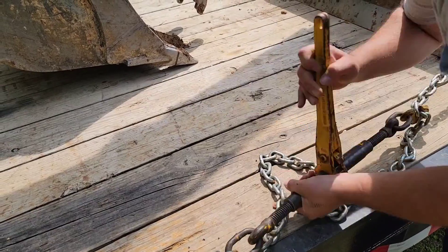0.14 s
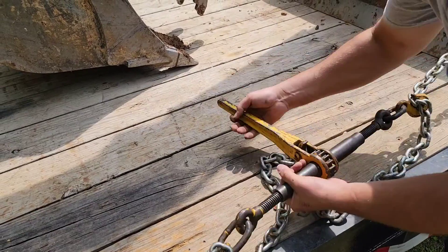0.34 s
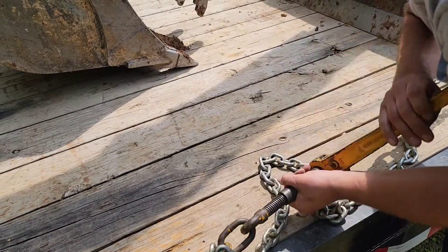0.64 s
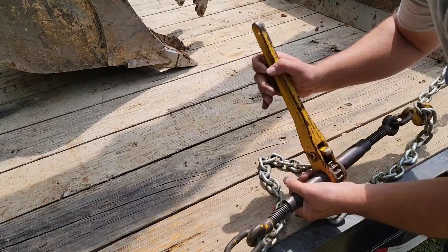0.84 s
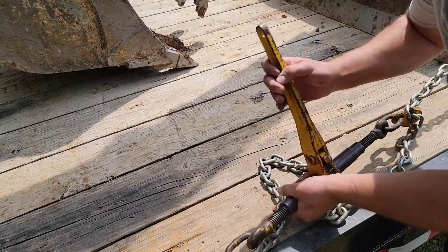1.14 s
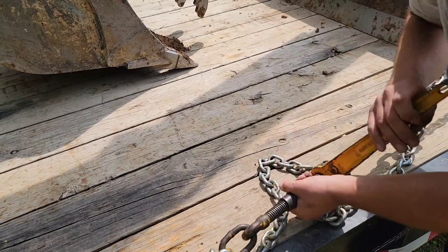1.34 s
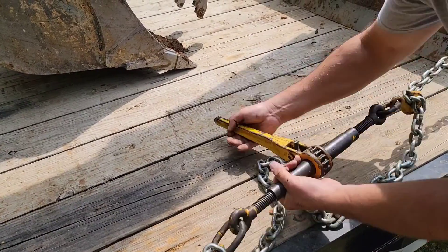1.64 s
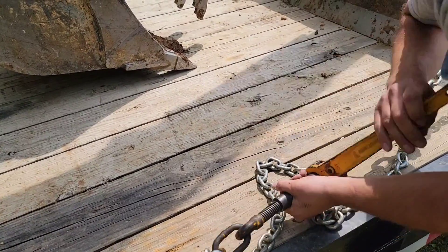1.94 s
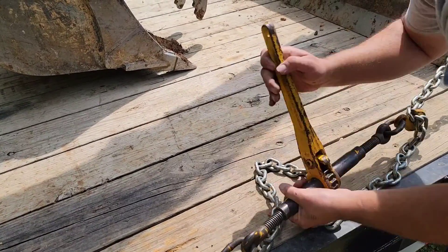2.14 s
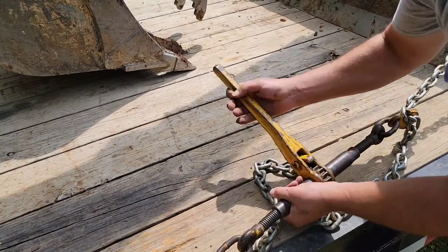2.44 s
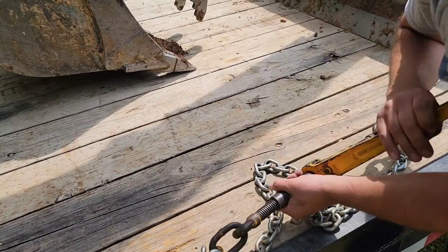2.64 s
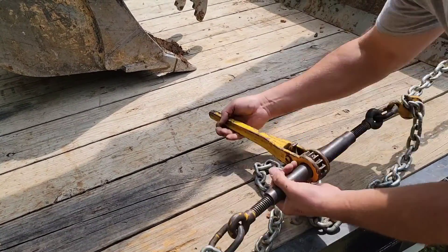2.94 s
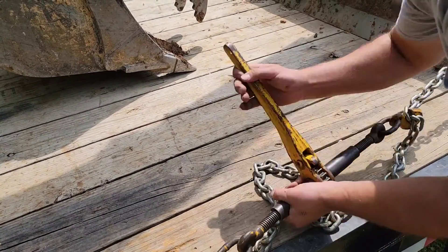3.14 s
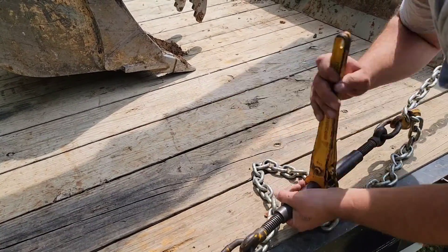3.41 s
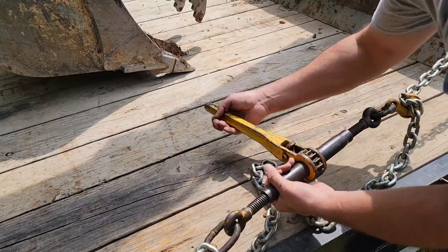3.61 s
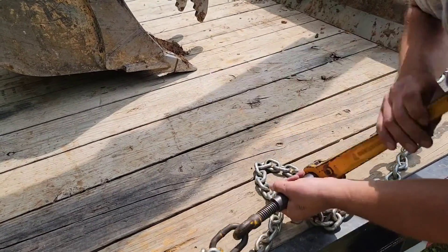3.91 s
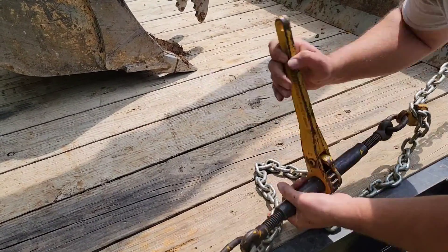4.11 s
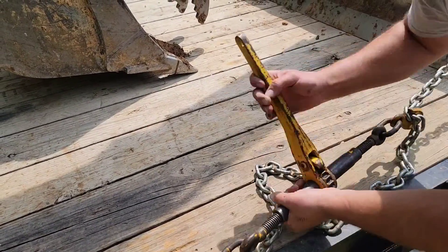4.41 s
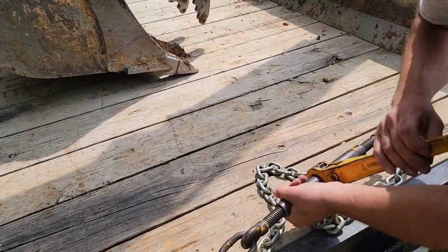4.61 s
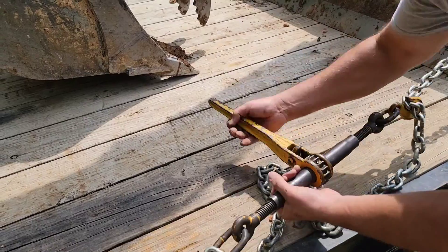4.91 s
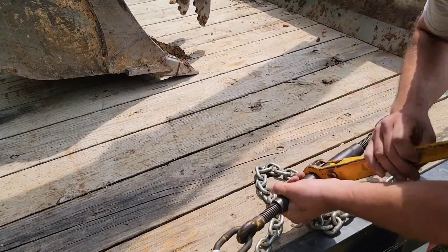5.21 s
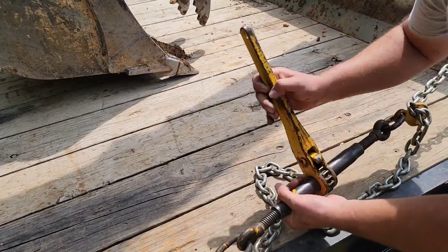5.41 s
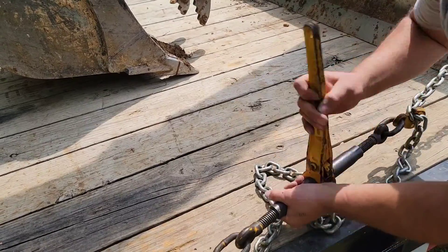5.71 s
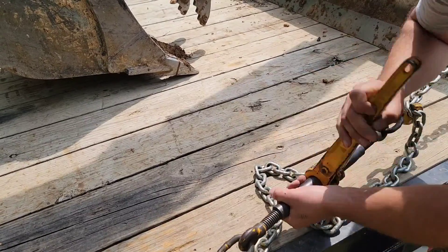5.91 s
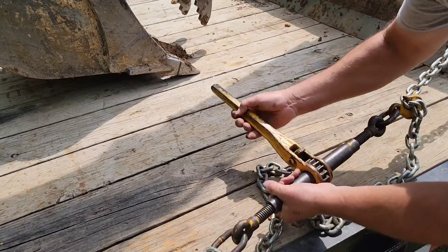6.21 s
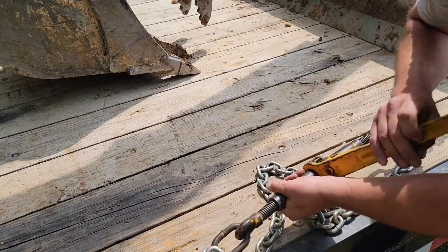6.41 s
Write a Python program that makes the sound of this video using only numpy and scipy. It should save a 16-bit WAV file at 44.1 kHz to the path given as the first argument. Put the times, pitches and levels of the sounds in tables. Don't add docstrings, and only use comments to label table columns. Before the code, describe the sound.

Outdoors on a wooden trailer deck, a steel ratchet is cranked steadily very close to a stereo microphone. Each back stroke gives about four fast, bright, ringing pawl clicks; each reversal brings a solid clank with loose steel chatter. Chain links jostle and tick, planks answer with short woody knocks, and a faint low breeze rumbles beneath. About ten strokes pass, still going at the end.

```python
import sys
import numpy as np
from scipy import signal
from scipy.fft import rfft, irfft
from scipy.io import wavfile

SR = 44100
rng = np.random.default_rng(int(sys.argv[2]) if len(sys.argv) > 2 else 0)


def master_out(mix):
    frames = np.transpose(np.atleast_2d(mix))
    ceiling = np.clip(frames, -1, 1)
    pcm = np.round(ceiling * 32767).astype(np.int16)
    wavfile.write(sys.argv[1], SR, pcm)


def gain_from_db(level_db):
    decades = np.asarray(level_db, float) / 20
    return 10 ** decades


N = 288840


def rms_one(x):
    return x / np.sqrt(np.mean(x ** 2) + 1e-20)


def filtered(x, order, band_hz, kind):
    return signal.sosfilt(signal.butter(order, band_hz, kind, fs=SR, output="sos"), x)


def resonances(x, peaks):
    out = 0
    for hz, width_hz, gain_db in peaks:
        out = out + gain_from_db(gain_db) * signal.lfilter(*signal.iirpeak(hz, hz / width_hz, fs=SR), x)
    return out


def coloured(x, spectrum):
    hz = np.maximum(np.arange(1025) * SR / 2048, 10)
    point_hz, point_db = np.transpose(spectrum)
    log_gain = np.interp(np.log(hz), np.log(point_hz), point_db) * np.log(10) / 20
    cepstrum = irfft(log_gain)
    cepstrum[1:1024] *= 2
    cepstrum[1025:] = 0
    impulse = irfft(np.exp(rfft(cepstrum)))
    return signal.oaconvolve(x, impulse[None], axes=1)[:, :N]


def both_ports(shared, alike):
    alike = np.clip(alike, 0, 1)
    return np.sqrt(alike) * shared[0] + np.sqrt(1 - alike) * shared[1:]


def port_noise(n, alike):
    return both_ports(rng.standard_normal((3, n)), alike)


def contacts(per_s, spread_db):
    born = rng.random(N) < per_s / SR
    return born * gain_from_db(spread_db * np.minimum(rng.exponential(1, N), 4))


def ring(drive, modes, alike):
    out, clicks = np.zeros((2, N)), np.full((2, N), 1e-18)
    at = np.flatnonzero(drive)
    for hz, level_db, t60_s in modes:
        clicks[:, at] = gain_from_db(level_db) * drive[at] * port_noise(len(at), alike)
        r, w = gain_from_db(-60 / (t60_s * SR)), 2 * np.pi * hz / SR
        out += signal.lfilter([0, np.sin(w)], [1, -2 * r * np.cos(w), r * r], clicks)
    return out


def bursts(times_s, levels_db, t60s_s):
    envelope, t = np.zeros(N), np.arange(SR // 4) / SR
    for s, level_db, t60_s in zip(times_s, levels_db, t60s_s):
        at = round(s * SR)
        envelope[at:at + len(t)] += gain_from_db(level_db - 60 * t / max(t60_s, .004))[:N - at]
    return envelope


def struck(modes, t, draw, scatter_db, detune):
    draw = draw[:, :len(modes)]
    hz, level_db, t60_s = np.transpose(modes)
    pole = 2j * np.pi * hz * (1 + detune * draw[5]) - np.log(1000) / t60_s
    strength_db = level_db + scatter_db * (draw[2] + 0.14 * draw[3:5])
    start = gain_from_db(strength_db) * np.exp(.9j * draw[:2])
    return (start @ np.exp(np.outer(pole, t))).imag


def teeth():
    # first tooth t/s, fourth tooth t/s, middle teeth late/ms, first ring/dB, fourth ring/dB
    strokes = [
        (0.017, 0.1204, 1, -4, -13),
        (0.6446, 0.7501, -1, -4.5, -12.5),
        (1.274, 1.378, -0.5, -5, -14.5),
        (1.9266, 2.0322, 0.6, -7.5, -7.5),
        (2.6235, 2.7263, 1.5, -6, -9.5),
        (3.2707, 3.3684, -2.8, -5, -6),
        (3.924, 4.0177, -1.5, -12.5, -8.5),
        (4.568, 4.657, -1.5, -4.5, -11.5),
        (5.1993, 5.2882, 0, -5, -9.5),
        (6.4331, 6.5226, -0.5, -6.5, -12.5),
    ]
    # t/s, ring/dB, barrel knock/dB
    lone_teeth = [
        (2.0948, -14, -25),
        (3.4134, -22, -25.5),
        (3.894, -16.5, -24.5),
        (4.075, -8.5, -28.5),
        (4.725, -12.5, -23),
        (5.3463, -28, -25.5),
        (5.8318, -9, -18),
        (5.8622, -11, -21),
        (5.895, -9.5, -17),
        (5.9472, -16, -19.5),
    ]
    along = np.arange(4) / 3
    knock_db = -18.5 + 0.5 * along
    runs = []
    for first_s, last_s, late_ms, first_db, last_db in strokes:
        middle = along % 1 > 0
        s = first_s + (last_s - first_s) * along + late_ms / 1000 * middle
        runs.append(np.transpose([s, first_db + (last_db - first_db) * along, knock_db]))
    return np.concatenate(runs + [lone_teeth])


def pawl():
    # f/Hz, level/dB, t60/s
    pawl_modes = [(9130, -16.5, 0.14), (9670, -13.5, 0.059), (9700, -11.5, 0.02), (10650, -14.5, 0.068),
                  (10930, -11, 0.037), (8650, -13, 0.075), (7380, -15, 0.014), (11570, -30.5, 0.021),
                  (14500, -20.5, .03), (14400, -20.5, 0.023), (15450, -13, .03)]
    # f/Hz, level/dB, t60/s
    knock_modes = [(1968, -5, 0.077), (2534, -4.5, 0.067), (2950, -0.5, 0.12), (3332, -1.5, 0.052),
                   (4480, -1, 0.14), (5250, -1, 0.043), (6500, 3, 0.051), (1271, -6, .04),
                   (2318, -13.5, 0.1), (3510, -2, 0.032)]
    # f/Hz, width/Hz, level/dB
    after_ring = [
        (9080, 160, 0),
        (9830, 350, 5.5),
        (10750, 200, -11.5),
    ]
    out, t = np.zeros((2, N + SR)), np.arange(SR // 8) / SR
    rise = 1 - np.exp(-(t / 0.00082) ** 2)
    fade = 1 - t / t[-1]
    for s, ring_db, knock_db in teeth():
        draw = rng.standard_normal((4, 6, 16))
        land_s = .0082 + .0012 * rng.standard_normal()
        damp = gain_from_db(-9.0 / (1 + np.exp((land_s - t) / 0.00067)))
        ring_hz, pan_db = 9250 + 92 * draw[3, 1, 0], 3 * draw[3, 2, 0]
        modes = [(ring_hz, -1.5, .045)] + pawl_modes
        snap = gain_from_db(ring_db + 0.5) * damp * struck(modes, t, draw[0], 1.8, detune=.005)

        knock = struck(knock_modes, t, draw[1], 2.5, detune=.05)
        later = np.maximum(t - land_s, 0)
        rebound = (t > land_s) * struck(knock_modes, later, draw[2], 2.5, detune=.05)
        snap += gain_from_db(knock_db - 5) * (knock + .5 * rebound) * damp

        unresolved = filtered(port_noise(len(t), 0.21), 2, 1200, "high")
        colour = [(hz, 900, 3.8 * tint) for hz, tint in zip(np.geomspace(2200, 15300, 9), draw[3, 0])]
        crack = 0.56 * unresolved + resonances(unresolved, colour)
        snap += gain_from_db(ring_db - 13.0 - 60 * t / 0.07) * damp * crack
        snap += gain_from_db(ring_db - 17.5 - 60 * t / 0.3) * fade * resonances(unresolved[:, ::-1], after_ring)
        snap += gain_from_db(ring_db - 34.5 - 60 * t / 0.3) * fade * unresolved
        at = round(s * SR)
        out[:, at:at + len(t)] += rise * snap * gain_from_db([[pan_db / 2], [-pan_db / 2]])
    return out[:, :N]


def clanks():
    # t/s, peak/dB, deck re peak/dB, chatter t60/s
    slack = [(0.541, -27, -20, 0.15), (0.572, -25, -22.5, 0.033), (0.593, -15.5, -22, 0.12),
             (1.18, -20.5, -27, 0.27), (1.213, -13.5, -18.5, 0.31), (1.881, -10.5, -20, 0.24),
             (2.537, -17, -18, 0.13), (2.589, -10, -23, 0.095), (3.187, -38.5, -14.5, 0.14),
             (3.214, -18.5, -43, 0.066), (3.235, -17, -18.5, 0.46), (3.842, -40.5, -12, 0.12),
             (3.858, -22.5, -35.5, 0.35), (3.87, -10, -16.5, 0.4), (4.485, -27, -22.5, 0.24),
             (4.508, -13, -27, 0.28), (4.547, -9, -24.5, 0.19), (5.16, -7, -22, 0.21),
             (5.762, -23, -38, 0.12), (5.773, -7, -24.5, 0.17), (5.796, -7.5, -19.5, 0.061),
             (6.372, -19.5, -40, 0.064), (6.386, -17.5, -43, 0.024), (6.401, -12, -18.5, 0.22)]
    # t/s, peak/dB, deck re peak/dB, chatter t60/s
    seating = [
        (0.002, -14, -15, 0.12),
        (0.629, -18.5, -12.5, 0.11),
        (1.95, -11.5, -14.5, 0.055),
        (2.604, -17.5, -13, 0.14),
        (3.297, -19.5, -8, 0.11),
        (4.579, -15, -4.5, 0.074),
        (5.817, -17, -10.5, 0.32),
    ]
    # t/s, peak/dB, treble re peak/dB, chatter t60/s
    engage = [(0.26, -16.5, -20, 0.16), (0.369, -23, -2.5, 0.085), (0.915, -15, -6, 0.1),
              (0.928, -16.5, 1.5, 0.17), (1.526, -13.5, -6, 0.23), (1.564, -12, -37, 0.074),
              (2.21, -16.5, -12, 0.15), (2.223, -15, -1, 0.16), (2.897, -16.5, -3, 0.11),
              (2.911, -17, -24.5, 0.18), (3.542, -23.5, -32, 0.16), (3.551, -19, -6, 0.17),
              (4.194, -24, -1, 0.11), (4.208, -19, -1, 0.22), (4.219, -14, -22, 0.079),
              (4.816, -22, -24, 0.18), (4.845, -18, -21, 0.091), (5.446, -27.5, 1, 0.15),
              (5.459, -20, -15, 0.27), (5.496, -21, 1, 0.086), (5.667, -28.5, -6, 0.04),
              (6.067, -13, -10, 0.16)]
    # t/s, deck/dB, t60/s
    thuds = [
        (0.614, -23, 0.093),
        (1.239, -40.5, 0.21),
        (0.94, -38, 0.13),
        (1.564, -27, 0.09),
        (3.509, -33.5, 0.11),
        (4.599, -37.5, 0.32),
        (6.326, -42.5, 0.11),
    ]
    rows = [(s, db, -39, deck_db, t60_s) for s, db, deck_db, t60_s in slack]
    rows += [(s, db, 1.5, deck_db, t60_s) for s, db, deck_db, t60_s in seating]
    touch = np.diff([row[0] for row in engage], append=np.inf) < .02
    for (s, db, treble_db, t60_s), first in zip(engage, touch):
        rows.append((s, db, treble_db, -23.5 if first else -20, t60_s))
    rows += [(s, db - 22, 0, 20, t60_s) for s, db, t60_s in thuds]
    return np.transpose(rows)


def jostle():
    # t/s, steel/dB, deck/dB
    shakes = [(0.01, -32, -33), (0.68, -36.5, -35), (1.4, -41, -38.5), (1.97, -40, -35), (2.73, -42.5, -37),
              (3.39, -45.5, -52), (4.0, -62, -53), (4.7, -44.5, -43), (5.24, -41.5, -44),
              (5.86, -45.5, -57), (6.47, -42, -33)]
    rise_db_per_s, fall_db_per_s, rest_db = 111, 78.5, -61
    s, steel_db, deck_db = np.transpose(shakes)[:, :, None]
    after_s = np.arange(N) / SR - s
    below_db = np.maximum(-rise_db_per_s * after_s, fall_db_per_s * after_s)
    return [np.maximum((db - below_db).max(axis=0), rest_db) for db in (steel_db, deck_db)]


def chain():
    # f/Hz, level/dB, t60/s
    steel_modes = [(1165, -16.5, 0.14), (1316, -3.5, 0.082), (1407, -8, 0.077), (1631.5, -10, 0.18),
                   (1960, -14, 0.069), (2355, -8, 0.025), (2610, -2.5, 0.061), (2584, -1.5, 0.087),
                   (2676, -6.5, 0.081), (2755, -5, 0.096), (2982, -6, 0.074), (3094, -3.5, 0.096),
                   (3315, 0.5, 0.045), (3520, -4.5, 0.046), (3960, -16, 0.17), (4300, -2.5, 0.032),
                   (4420, -21, 0.062), (4950, -25, 0.02), (5400, -2.5, 0.054), (6250, -4, 0.027)]
    # f/Hz, level/dB, t60/s
    deck_modes = [(195.5, -12.5, 0.11), (274.7, -14, 0.11), (343.8, -8, 0.12), (390.7, -6, 0.12),
                  (465, -9, 0.077), (531, -6.5, 0.08), (605, -3.5, 0.14), (661.3, -6, 0.11),
                  (718.3, 4, 0.063), (796, -12.5, 0.088), (878, -1.5, 0.055)]
    # f/Hz, level/dB per Hz
    crack = [(410, -43), (700, -13), (1680, -6), (2130, -10), (2630, -5), (3750, -9.5), (4280, -7.5),
             (9470, -22.5), (10500, -31), (15200, -27.5), (16500, -41)]
    s, peak_db, treble_db, bass_db, t60_s = clanks()
    steel_db, deck_db = jostle()
    hits = contacts(700, spread_db=5.0)
    hits[np.round(s * SR).astype(int)] = 5.3
    blows = bursts(s, peak_db - 9.0, t60_s)
    out = gain_from_db(-21.5) * ring(hits * (blows + gain_from_db(steel_db - 3.0)), steel_modes, 0.49)
    deck_blows = bursts(s, peak_db + bass_db, 1.496 * t60_s)
    out += gain_from_db(-18) * ring(hits * (deck_blows + gain_from_db(deck_db - 7)), deck_modes, 0.29)
    grit = contacts(9000, spread_db=3.0) * port_noise(N, 0.058)
    out += gain_from_db(13) * coloured(grit * (gain_from_db(1.5) * blows + gain_from_db(steel_db + 3.5)), crack)
    treble = bursts(s, peak_db + treble_db - 14.0, 0.61 * t60_s) * port_noise(N, 0.2)
    treble = filtered(treble, 2, 7000, "high")
    return out * gain_from_db([[-.7], [.7]]) + treble * gain_from_db([[1.2], [-1.2]])


def ticks():
    # t/s, peak/dB, f/Hz
    touches = [(0.192, -22.5, 4000), (0.4379, -29.5, 2650), (0.8709, -25.5, 3140), (1.036, -30, 3960),
               (1.4486, -21.5, 4500), (1.502, -27, 2650), (1.6494, -33, 2610), (1.74, -26.5, 2780),
               (2.5829, -14, 2610), (2.8425, -25.5, 4770), (2.9532, -20, 2540), (3.0609, -36, 5780),
               (3.0842, -28, 5590), (3.478, -27, 3060), (3.666, -31, 4220), (3.789, -37, 5440),
               (4.116, -27, 5800), (4.4232, -39, 3000), (4.799, -25, 2640), (4.922, -20, 6640),
               (5.1405, -24, 2590), (5.347, -8, 3300), (3.4134, -20, 3300), (0.211, -25, 5500),
               (5.61, -36, 6000), (5.5823, -26, 2590), (5.7418, -27, 2590), (6.36, -26.5, 4340)]
    out, t = np.zeros((2, N + SR)), np.arange(SR // 20) / SR
    for s, peak_db, hz in touches:
        noise = port_noise(len(t), 0.23)
        crack = filtered(noise, 2, 2500, "high") + resonances(noise, [(hz, 500, 9.0)])
        at = round(s * SR)
        out[:, at:at + len(t)] += gain_from_db(peak_db - 15.5 - 60 * t / 0.046) * crack
    return out[:, :N]


def outdoors():
    # t/s, level/dB
    breeze = [(0.0, -50.5), (0.58, -40.5), (0.62, -45.5), (1.13, -36), (1.37, -49.5), (1.57, -39.5),
              (2.04, -45.5), (2.66, -43.5), (2.88, -49.5), (4.01, -43), (4.14, -60), (4.52, -52),
              (4.58, -41), (4.69, -50), (5.87, -43.5), (6.26, -57.5), (6.46, -44), (6.55, -46)]
    # f/Hz, level/dB per Hz
    air = [(88, -32), (150, -0.5), (434, -2), (696, -5), (972, -10), (1280, -8.5), (3100, -14.5),
           (11600, -28), (15300, -29), (16500, -55.5)]
    breeze_db = np.interp(np.arange(N) / SR, *np.transpose(breeze))
    gust_db = 2.0 * rms_one(filtered(rng.standard_normal(N), 1, [2.5, 9], "band"))
    low = filtered(port_noise(N + SR, .12), 2, [40, 110], "band")[:, SR:]
    hush = rms_one(coloured(port_noise(N, 0.091), air))
    rumble = gain_from_db(breeze_db + 2.0 + gust_db) * rms_one(low) * gain_from_db([[1.2], [-1.2]])
    return rumble + gain_from_db(-52.5) * hush


def scene():
    left_lag_samples = 4
    near = pawl() + chain() + ticks()
    near[0] = np.concatenate([np.zeros(left_lag_samples), near[0, :-left_lag_samples]])
    return near + outdoors()


def top_cut(x):
    return signal.sosfilt(signal.butter(12, 17140, fs=SR, output="sos"), x)


def record(dry):
    # f/Hz, width/Hz, lift/dB
    mic_peak = (15600, 850, 4.9)
    hz, width_hz, lift_db = mic_peak
    lifted = dry + (gain_from_db(lift_db) - 1) * resonances(dry, [(hz, width_hz, 0)])
    rounded = .97 * np.tanh(lifted / .97)
    shelved = signal.sosfilt(signal.cheby2(12, 20, 15900, fs=SR, output="sos"), rounded)
    cut = signal.sosfilt(signal.cheby2(16, 50, 16750, fs=SR, output="sos"), shelved)
    return top_cut(cut)


dry = scene()
out = record(dry)
master_out(out)
```